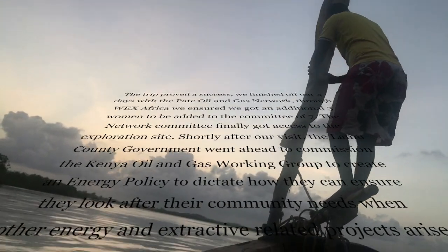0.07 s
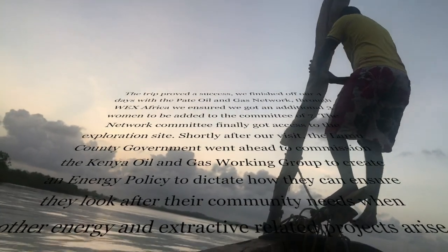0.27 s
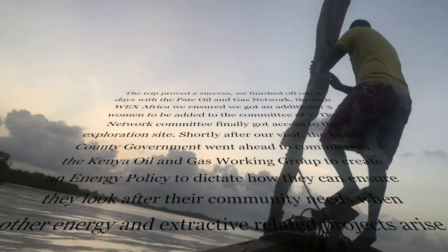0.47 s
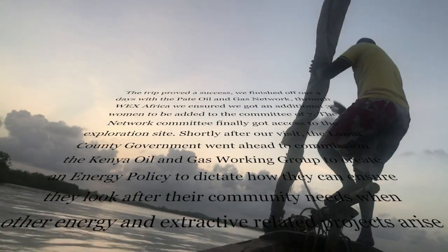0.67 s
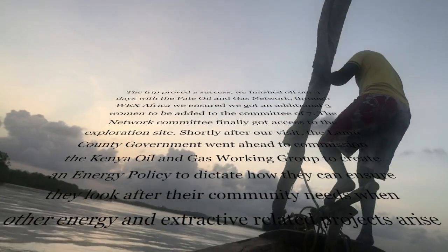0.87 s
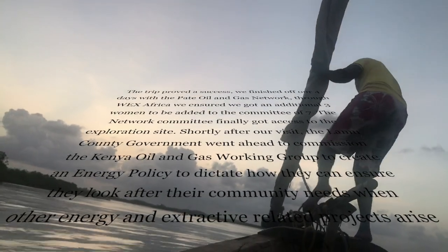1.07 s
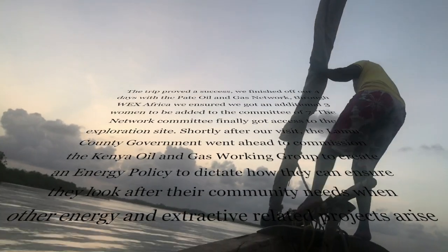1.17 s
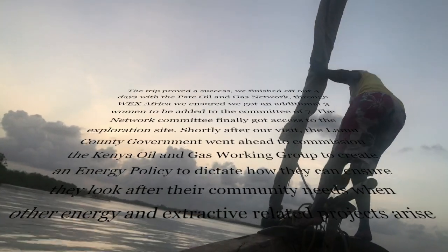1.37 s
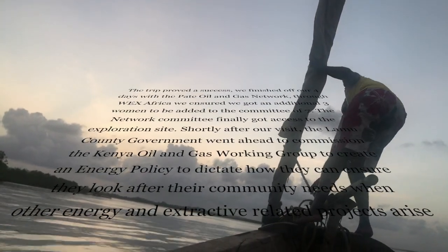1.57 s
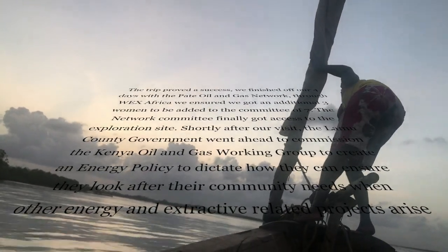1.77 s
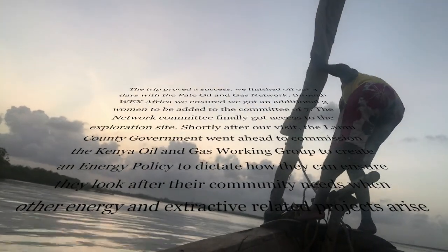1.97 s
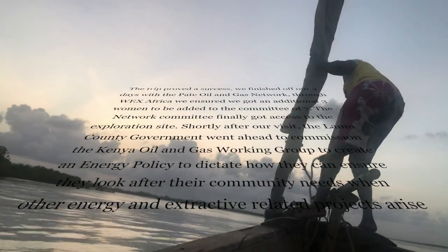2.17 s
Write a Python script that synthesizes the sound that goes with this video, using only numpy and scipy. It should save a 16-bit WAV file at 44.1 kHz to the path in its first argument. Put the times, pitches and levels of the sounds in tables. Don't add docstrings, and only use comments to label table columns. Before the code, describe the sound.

Wooden boat hull knocks and thumps under shifting feet, over low rumble of water and wind

```python
import sys
import numpy as np
from scipy import signal
from scipy.fft import rfft, irfft
from scipy.io import wavfile
from scipy.ndimage import uniform_filter1d

SR = 44100
rng = np.random.default_rng(int(sys.argv[2]) if len(sys.argv) > 2 else 0)


def ratio(d):
    e = np.asarray(d, float) / 20
    return 10 ** e


def wrap_up_sound(samples):
    columns = np.atleast_2d(samples).T
    tamed = np.clip(columns, -1, 1)
    steps = np.round(tamed * 32767).astype(np.int16)
    wavfile.write(sys.argv[1], SR, steps)


N = 97020


def walk(rate):
    hold = int(SR / rate)
    steps = np.repeat(rng.standard_normal(N // hold + 1), hold)
    return 1.05 * uniform_filter1d(uniform_filter1d(steps, hold), hold)[:N]


def add(out, start_s, sound):
    i = max(int(start_s * SR), 0)
    out[i:i + len(sound)] += sound[:N - i]


def bell(length, hz, octaves):
    f = np.arange(length // 2 + 1) * SR / length + 1
    return np.exp(-(2 * np.log2(f / hz) / octaves) ** 2)


def water():
    # frequency in Hz, level in dB per Hz.
    spectrum = [(24, -12), (58, -0.5), (110, -5.5), (260, -18.5), (700, -31.5), (2200, -35.5),
                (2900, -39.5), (15800, -46.5)]
    # centre in Hz, width in octaves, boost in dB.
    resonances = [(365, 0.1, 5.5), (520, 0.59, 0.5), (1242, 0.15, 3.5), (6240, 0.18, 0.5)]
    # time in seconds, rise in dB.
    working = [(0, 1), (.2, 4), (.36, 0), (.5, 3), (.8, 5), (.97, 3.5), (1.1, 0), (1.3, 0), (1.45, 0),
               (1.75, 0.5), (1.9, 1.5), (2.2, 1.5)]
    level_db, swell_db, flicker_db = -46.5, 1.42, 2

    f = np.arange(N // 2 + 1) * SR / N + 1
    curve_hz, curve_db = np.transpose(spectrum)
    shape_db = np.interp(np.log(f), np.log(curve_hz), curve_db)
    shape_db = shape_db + sum(db * bell(N, hz, octaves) for hz, octaves, db in resonances)
    shape = ratio(shape_db) * (f > 18)
    gain = ratio(level_db) / np.sqrt(2 * np.sum(shape ** 2) / N)

    swell = walk(1.73)
    stir = np.interp(np.arange(N) / SR, *np.transpose(working))
    centres = 25 * 2 ** np.arange(0, 10, 0.5)
    bells = np.array([bell(N, hz, 0.57) for hz in centres])
    bells /= np.sqrt(np.sum(bells ** 2, axis=0)) + 1e-9
    out = np.zeros(N)
    for hz, band_shape in zip(centres, bells):
        share = np.interp(np.log(hz), np.log([150, 2500, 7000]), [0.93, 0.6, 0.28])
        band = irfft(rfft(rng.standard_normal(N)) * shape * band_shape, N)
        out += band * ratio(share * (stir + swell_db * swell + flicker_db * walk(13.8)))
    return out * gain


def rubbing(rubs):
    grit_db, attack_share = 4, 0.053
    size = 16384
    t = np.arange(size) / SR
    out = np.zeros(N)
    for start, length, db, hz, octaves in rubs:
        clicks, unevenness = rng.standard_normal((2, size))
        grit = ratio(grit_db * 5.7 * uniform_filter1d(unevenness, size=40))
        rub = irfft(rfft(clicks * grit) * bell(size, hz, octaves))
        attack = 1 - np.exp(-t / (attack_share * length))
        fade = np.exp(-1.1 * (t / length) ** 2) * attack
        rms = np.sqrt(np.average(rub ** 2, weights=fade ** 2))
        add(out, start, ratio(db) * rub * fade / rms)
    return out


def groans():
    # start in seconds, length in seconds, level in dB, centre in Hz, width in octaves.
    plank_rubs = [
        (.225, 0.041, -58, 610, 1.1),
        (.418, 0.015, -48.5, 700, 0.69),
        (.60, 0.082, -43, 224, 1.2),
        (.70, 0.12, -56.5, 480, 0.94),
        (1.912, 0.017, -56, 475, .5),
        (0.00089, 0.087, -51, 214, 0.37),
        (1.17, 0.094, -56, 250, 0.6),
        (1.9, 0.24, -56, 187, 0.44),
        (0.024, 0.029, -51, 1800, 1.2),
    ]
    return rubbing(plank_rubs)


def brushes():
    # start in seconds, length in seconds, level in dB, centre in Hz, width in octaves.
    bright_rubs = [(0.023, 0.019, -59, 10200, 1.5), (0.429, .004, -55, 11500, 1.2),
                   (.5867, 0.003, -45, 5630, 0.7), (.5866, 0.0022, -44, 10500, 1.8),
                   (0.5867, .003, -45, 3170, 0.72), (0.604, 0.013, -57, 6660, 1.2),
                   (0.619, 0.0085, -57, 7500, 0.89), (0.6734, 0.0046, -50, 12600, 0.71),
                   (0.676, 0.016, -56, 8500, 1.7), (.001, 0.021, -58, 7000, 2.2),
                   (0.945, .002, -53.5, 9000, 2.3), (.992, .004, -61, 12000, .9),
                   (1.116, 0.003, -59, 12500, 0.54), (1.341, 0.018, -58, 6970, 0.8),
                   (1.342, 0.015, -64, 12900, .6), (.5866, 0.002, -44, 8400, 0.78),
                   (.5867, 0.0032, -50, 4420, 0.3), (0.677, 0.014, -55, 3550, 0.56),
                   (.733, 0.012, -63.5, 3900, .5)]
    return rubbing(bright_rubs)


def scuffs():
    # start in seconds, length in seconds, level in dB, centre in Hz, width in octaves. The row at
    # 0.613 s, near 326 Hz, is a low sustained hum of the knocked planks.
    sole_and_rope = [(.004, 0.05, -50.5, 1580, 1.6), (0.008, 0.053, -55, 3240, 1.7),
                     (0.028, 0.0061, -52, 3700, 0.44), (.002, 0.066, -50, 387, 2.2),
                     (.108, 0.038, -59, 1430, 1.7), (.112, 0.034, -63.5, 3500, 0.6),
                     (0.141, 0.0061, -56, 2500, 1.6), (0.169, 0.02, -53, 1140, 1.3),
                     (0.238, 0.022, -55.5, 1380, 2.15), (0.393, .012, -64, 4550, 0.79),
                     (0.411, .008, -50, 1500, 1.2), (0.613, 0.05, -45, 326, 1.8),
                     (.428, .005, -55.5, 2500, 0.38), (.5115, 0.016, -55, 1500, 1.3),
                     (0.595, 0.014, -47.5, 2020, 1.62), (0.609, 0.027, -44.5, 1850, 1.88),
                     (0.6595, .007, -56, 3700, 1.6), (0.673, 0.022, -50, 1760, 1.16),
                     (0.720, 0.047, -55, 1430, 1.7), (0.730, 0.015, -61.5, 3300, .9),
                     (0.756, 0.011, -52.5, 900, 1.4), (.89, 0.06, -66, 2550, .2),
                     (.88, 0.24, -64.5, 2530, 2.6)]
    return rubbing(sole_and_rope)


def ring(hz, t60, attack_s=1e-4):
    t = np.arange(SR // 4) / SR
    decay = np.exp(-np.log(1000) * t / t60)
    return np.sin(2 * np.pi * hz * t) * decay * (1 - np.exp(-t / attack_s))


def ticks():
    # start in seconds, level in dB, pitch in Hz, t60 in seconds.
    small_hits = [(.412, -38, 620, 0.029), (0.4135, -40, 1150, .025), (.4145, -47, 1450, .02),
                  (.4115, -44, 1950, .015), (.4235, -40, 720, .03), (.446, -47, 520, .06),
                  (.4172, -42.5, 1920, .012), (.5118, -52, 1600, 0.013), (.5868, -41, 4530, 0.011),
                  (.6135, -33, 285, 0.06), (.6218, -29, 345, 0.057), (.6075, -32, 530, .06),
                  (.6135, -38, 500, 0.035), (.642, -32, 395, .06), (.634, -37, 535, .09),
                  (.615, -41, 750, .04), (.618, -44, 1050, .04), (.5935, -43, 2320, .02),
                  (.6105, -38, 2500, .008), (.6195, -47, 2200, .01), (0.00625, -35, 1510, .015),
                  (.009, -40, 1100, .025), (.034, -42, 1050, .02), (.143, -48, 2150, .012),
                  (.17, -48, 1700, 0.017), (.0128, -44, 3380, .012), (.0145, -38, 1600, .015),
                  (0.019, -38, 1260, 0.025), (.026, -41, 3980, .01), (.0275, -38, 1290, 0.024),
                  (0.036, -42, 3500, 0.011), (0.036, -37, 1400, .015), (.4285, -37, 600, .025),
                  (.439, -50, 1150, 0.044), (.429, -50, 1600, .015), (0.83, -46, 1800, .02),
                  (.734, -46, 1780, .03), (.748, -46, 1000, .025), (.7585, -39, 670, 0.039),
                  (0.8, -51, 4000, .015), (.7315, -52, 2900, .01), (1.915, -47, 504, 0.043),
                  (.684, -47, 1150, .04), (.648, -38, 200, 0.062), (.655, -44, 400, .12),
                  (0.9448, -47.5, 3700, 0.018), (.985, -54, 2250, .03), (1.5, -58, 2100, 0.018),
                  (1.4, -55, 1340, 0.033), (1.509, -45, 1290, 0.035), (1.517, -61, 1300, 0.025),
                  (1.965, -58, 2000, 0.017)]
    out = np.zeros(N)
    for start, db, hz, t60 in small_hits:
        add(out, start, ratio(db) * ring(hz, t60, 0.00048))
    return out


def knocks():
    # pitch in Hz, level in dB, t60 in seconds.
    plank_modes = [(145, 0, 0.074), (246, 1, 0.055), (343.4, -0.5, 0.11), (418, -4.5, 0.081),
                   (503.4, -0.5, 0.097), (553, -4.5, 0.091), (668, -1.5, 0.026), (960, -4, 0.039),
                   (1130, -1.5, 0.025), (1384, 2, 0.062), (1850, 2, 0.039), (2500, -25, .02)]
    # start in seconds, level in dB, contact time in milliseconds.
    hits = [(.174, -52.5, 0.61), (0.4149, -47, 0.82), (.424, -42, 1.3), (0.428, -50, 0.8), (.512, -50, 0.4),
            (0.601, -46, 0.86), (.608, -40, 0.41), (.614, -40, 1.2), (0.619, -45, 4.2), (0.6243, -41, 1.14),
            (.641, -42, 2.5), (.682, -46.5, 0.91), (1.085, -46.5, 1.7), (1.915, -51.5, 1.3)]
    scatter_db, detune = 4, 0.017
    out = np.zeros(N)
    for start, db, contact_ms in hits:
        for hz, mode_db, t60 in plank_modes:
            level_chance, pitch_chance = rng.standard_normal(2)
            softness = 1 / (1 + (hz * contact_ms / 600) ** 2)
            level = softness * ratio(db + mode_db + scatter_db * level_chance)
            mode = ring(hz * (1 + detune * pitch_chance), t60, contact_ms / 3000)
            add(out, start, level * mode)
    return out


def thumps():
    # start in seconds, peak in dB, pitch in Hz, length in seconds.
    heels = [(0.235, -34, 56.6, 0.039), (0.4335, -34.5, 104, 0.018), (.443, -38, 120, .008),
             (0.4557, -33, 93, 0.019), (0.472, -36.5, 36.7, 0.031), (0.5115, -33.5, 50, 0.018),
             (0.6206, -20, 61, 0.039), (.670, -25, 52.4, 0.015), (0.7205, -31, 46, 0.024),
             (.7405, -29.5, 50, .026), (.845, -41, 150, .012), (.28, -40, 148, .03),
             (1.035, -35, 62, 0.023), (1.153, -37, 57, 0.036), (1.251, -39.5, 59.4, 0.024),
             (1.913, -39.5, 54, 0.043)]
    sag_per_s, attack_s = 12.4, 0.0012
    t = np.arange(SR // 4) / SR
    out = np.zeros(N)
    for start, db, hz, length in heels:
        turns = hz * (1 - np.exp(-sag_per_s * t)) / sag_per_s
        fade = np.exp(-(t / length) ** 4) * (1 - np.exp(-t / attack_s))
        add(out, start, ratio(db) * np.sin(2 * np.pi * turns) * fade)
    return out


def snap():
    # pitch in Hz, level in dB, t60 in seconds.
    fitting_modes = [(2190, -1, 0.029), (5180, -1, 0.007), (6130, -3, 0.008), (4480, -9, .01),
                     (3100, -12, .008)]
    start_s, level_db, stop_s = 0.5866, -27.5, 0.0043
    ringing = sum(ratio(db) * ring(hz, t60, 0.00027) for hz, db, t60 in fitting_modes)
    damping = np.exp(-(np.arange(SR // 4) / SR / stop_s) ** 4)
    out = np.zeros(N)
    add(out, start_s, ratio(level_db) * damping * ringing)
    return out


def scene():
    rubbed = groans() + brushes() + scuffs()
    struck = ticks() + knocks() + thumps() + snap()
    return (water() + rubbed + struck)[None]


def top_cut(x):
    return signal.sosfilt(signal.butter(12, 16580, fs=SR, output="sos"), x)


def record(dry):
    # centre in Hz, width in Hz, depth from 0 to 1.
    housing = [(7500, 690, 0.4), (10360, 700, 0.58)]
    top_hz, above_top_db = 15850, -24
    for hz, width, depth in housing:
        dry = dry - depth * signal.lfilter(*signal.iirpeak(hz, hz / width, SR), dry)
    f = np.arange(N // 2 + 1) * SR / N
    edge = np.where(f < top_hz, 1, ratio(above_top_db))
    return top_cut(irfft(rfft(dry) * edge, N))


dry = scene()
out = record(dry)
wrap_up_sound(out)
```